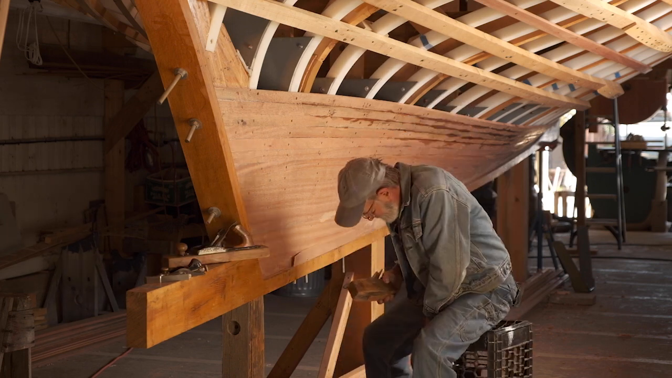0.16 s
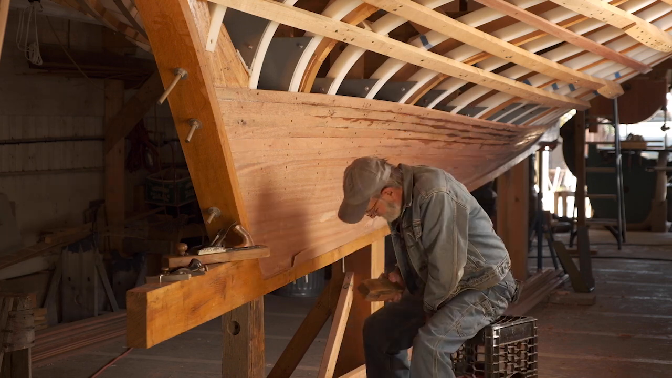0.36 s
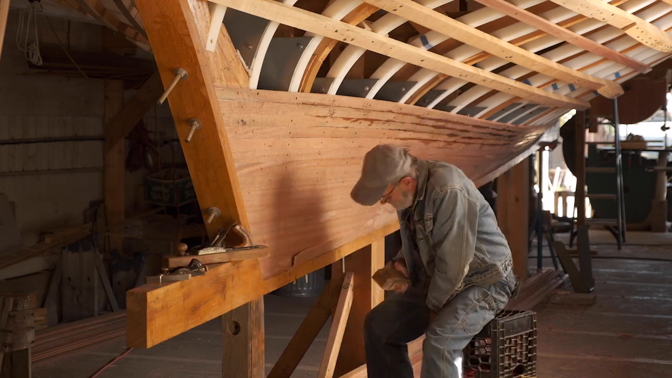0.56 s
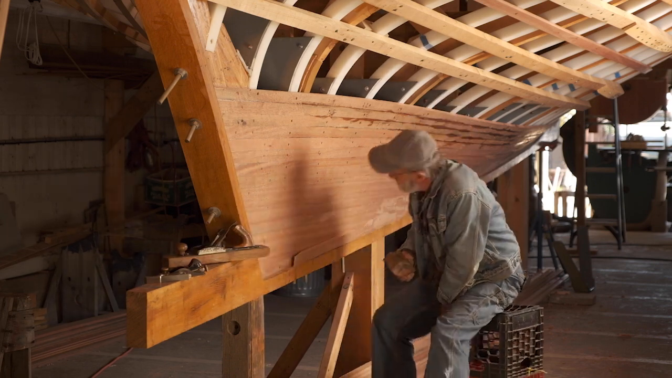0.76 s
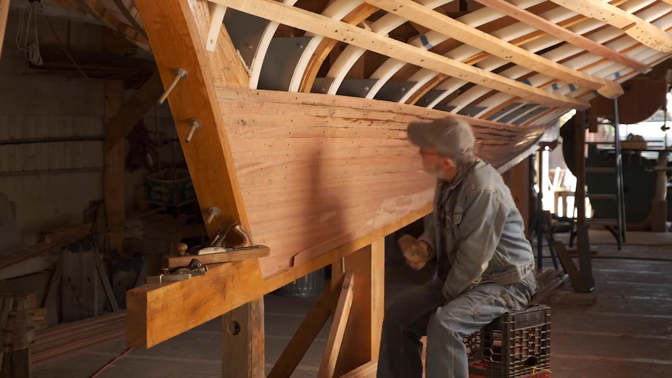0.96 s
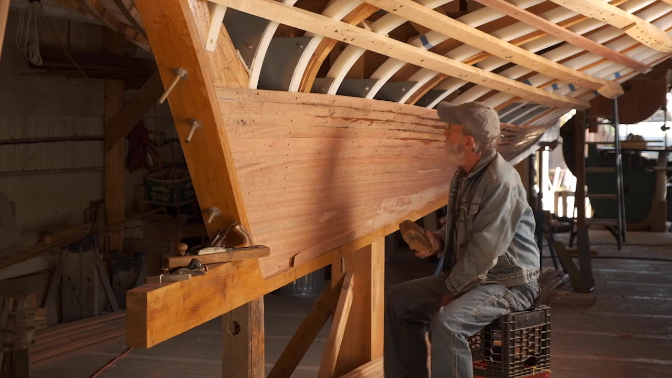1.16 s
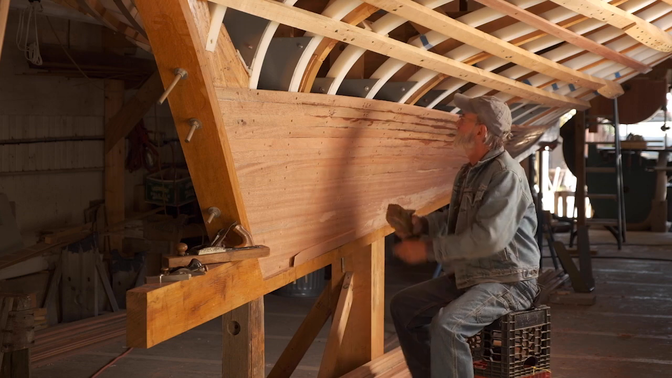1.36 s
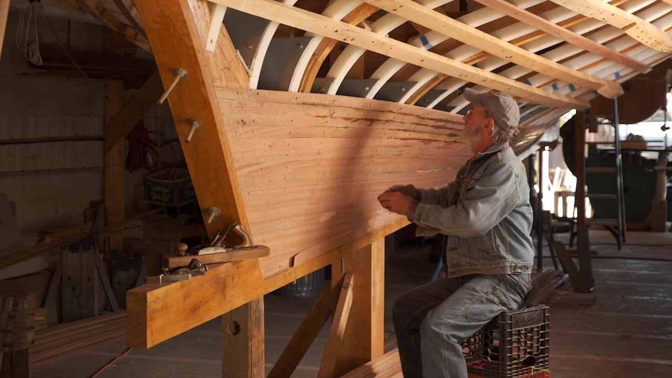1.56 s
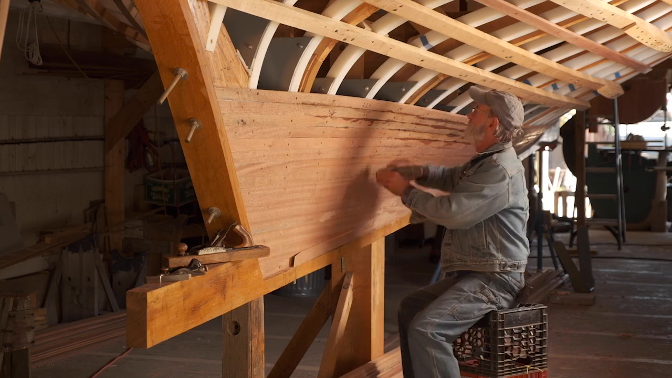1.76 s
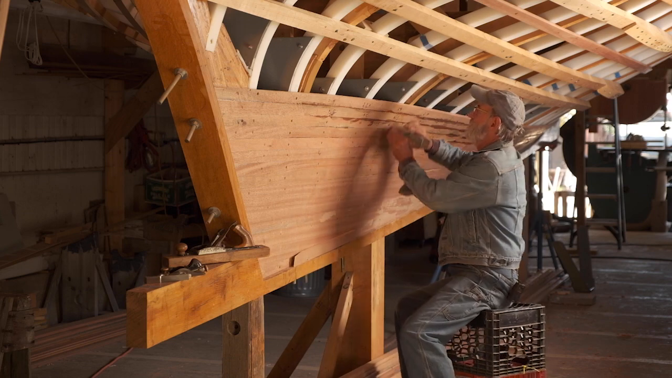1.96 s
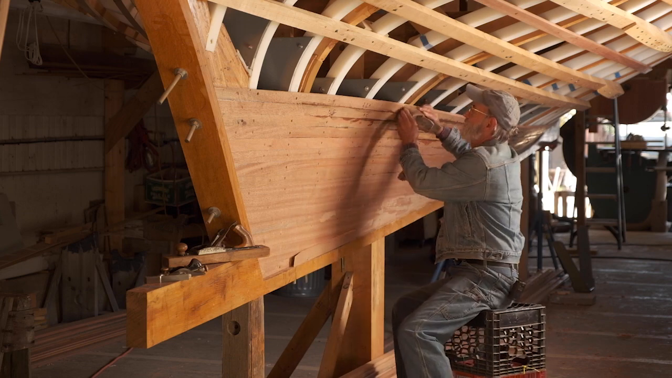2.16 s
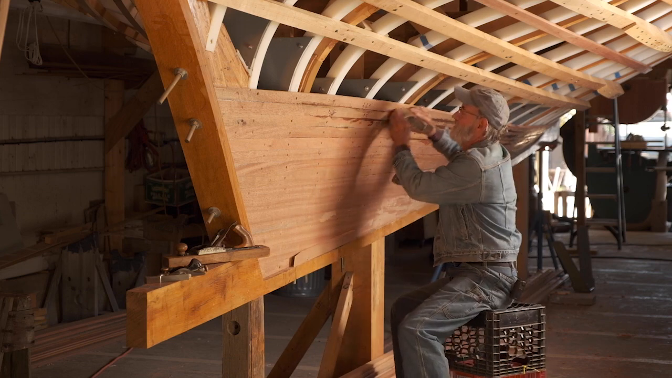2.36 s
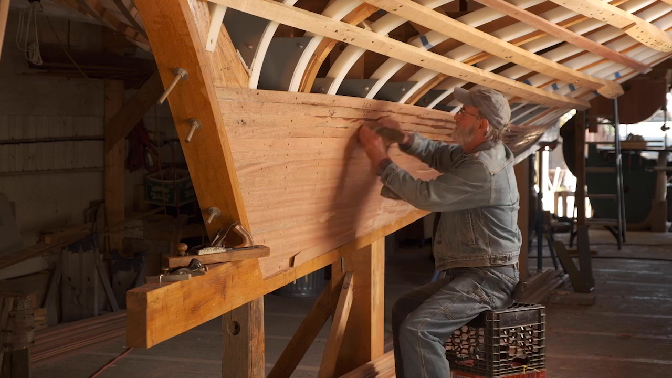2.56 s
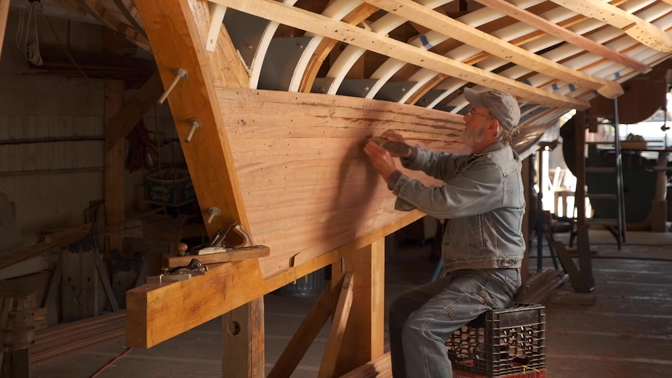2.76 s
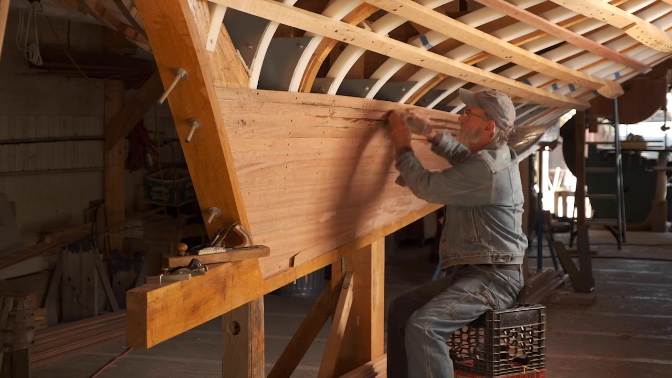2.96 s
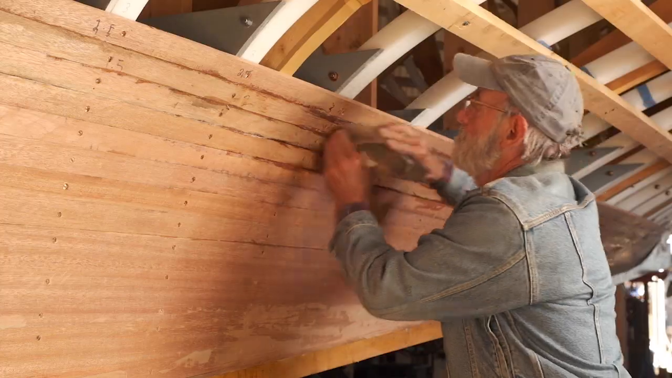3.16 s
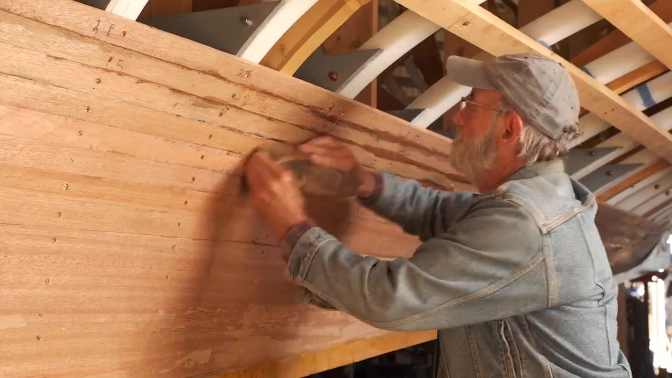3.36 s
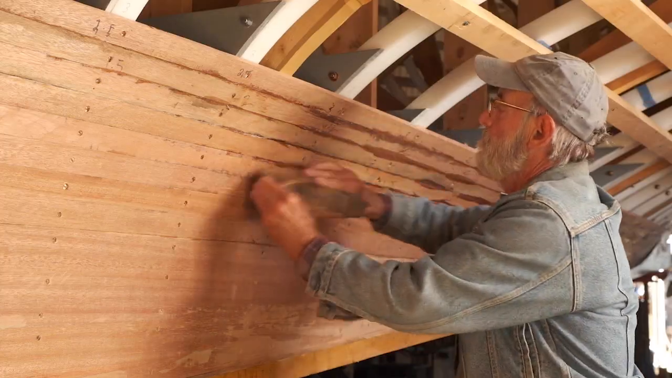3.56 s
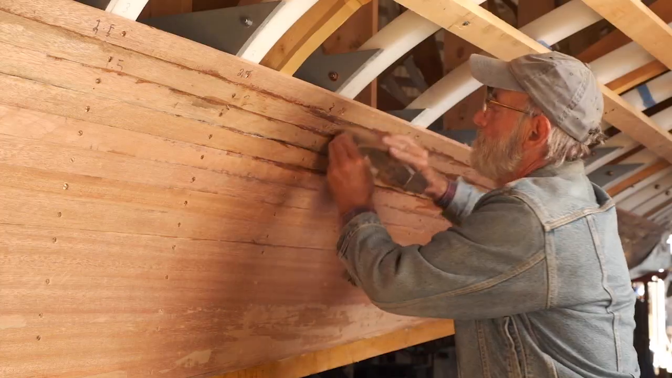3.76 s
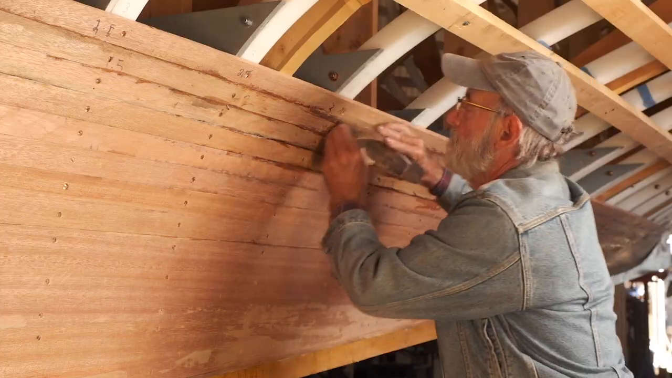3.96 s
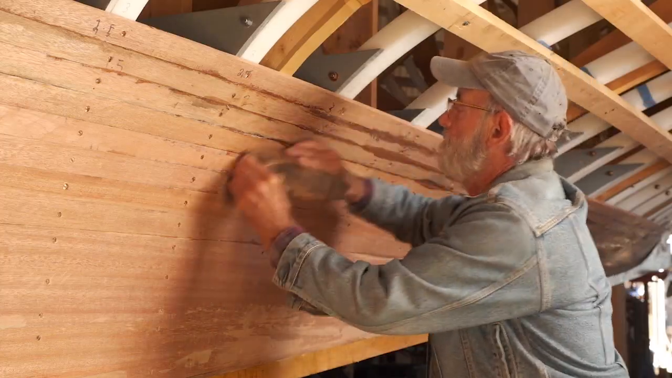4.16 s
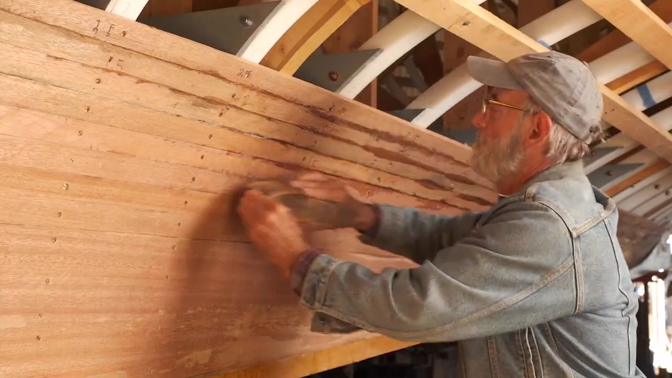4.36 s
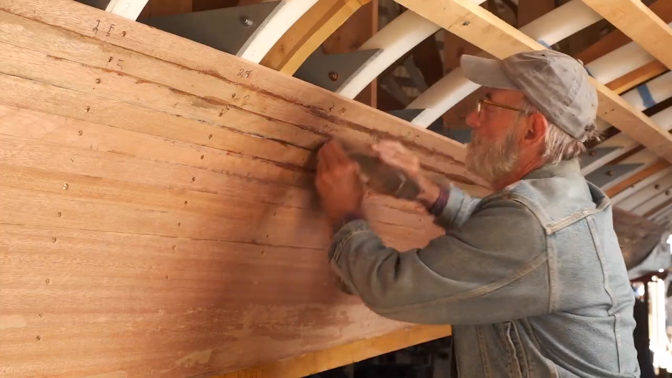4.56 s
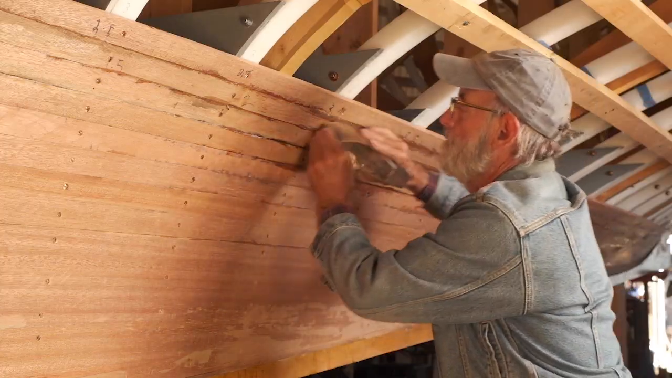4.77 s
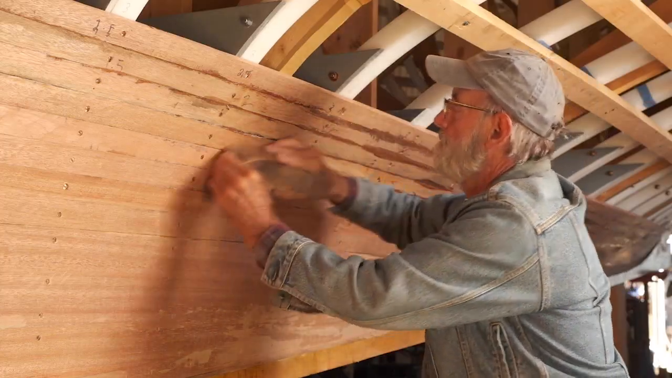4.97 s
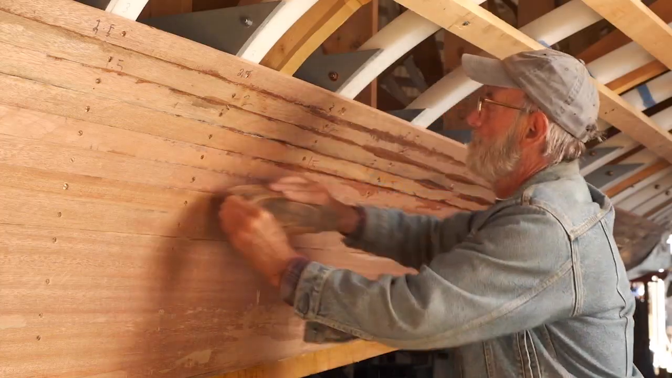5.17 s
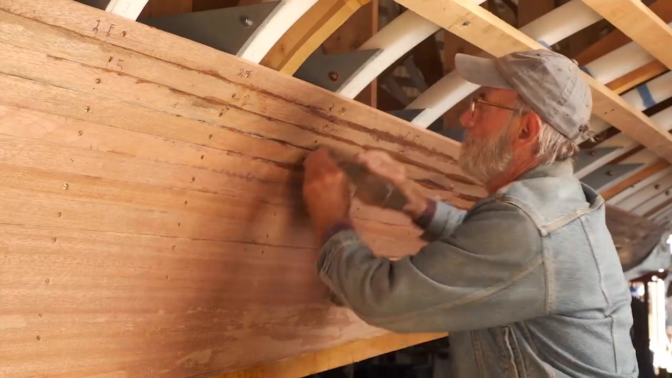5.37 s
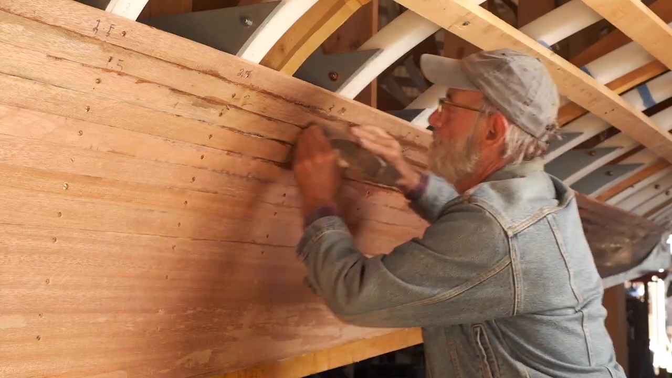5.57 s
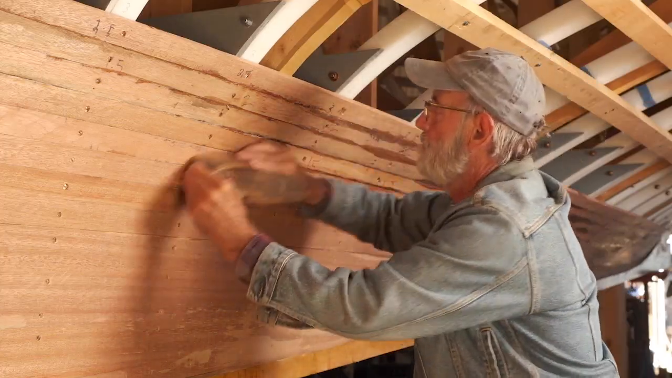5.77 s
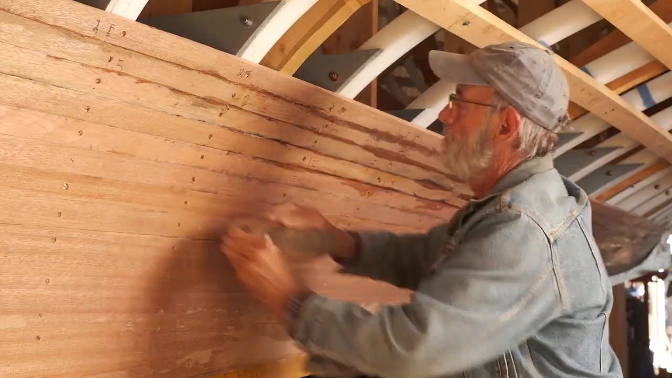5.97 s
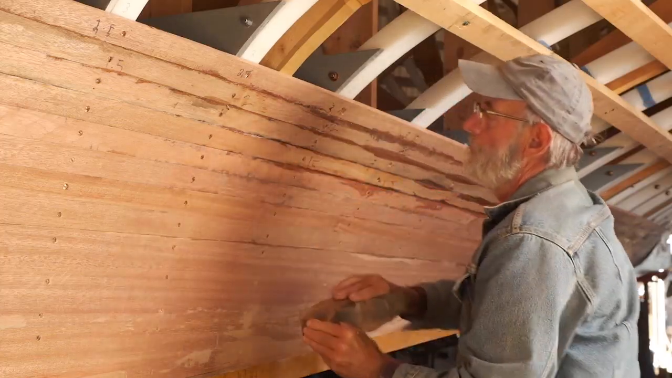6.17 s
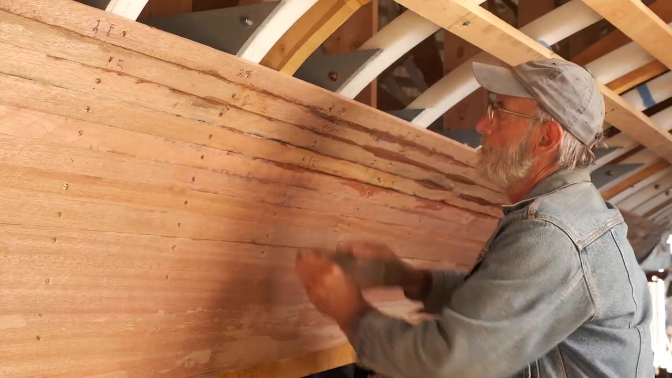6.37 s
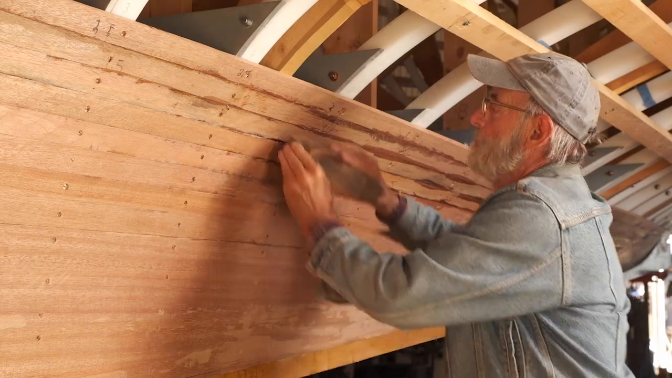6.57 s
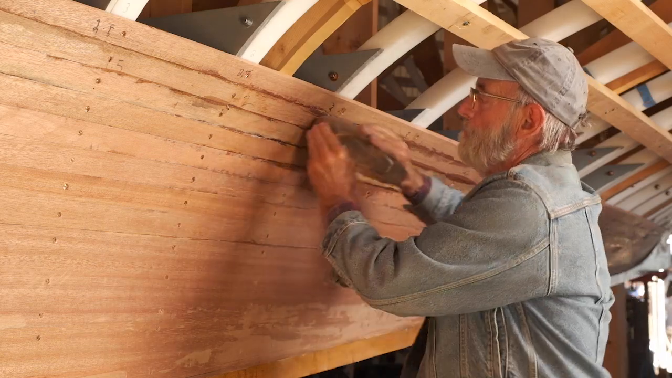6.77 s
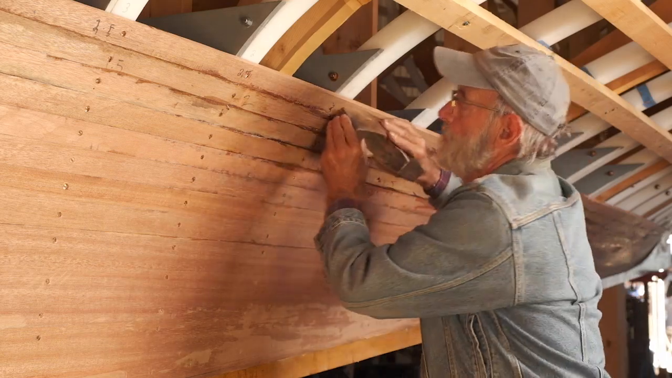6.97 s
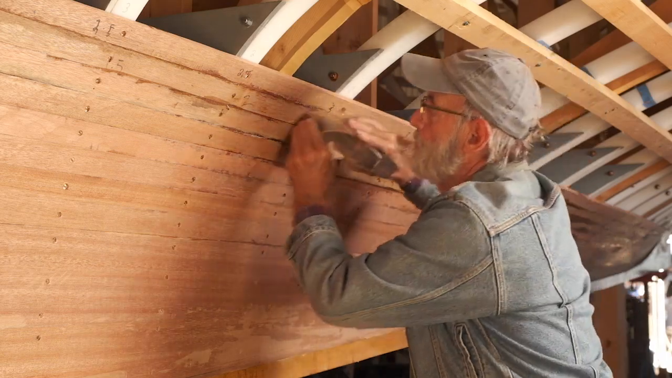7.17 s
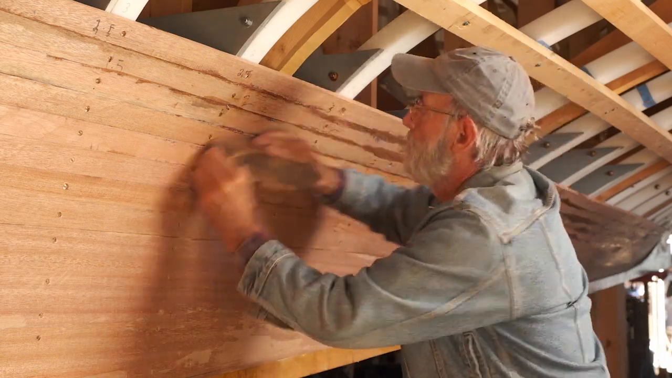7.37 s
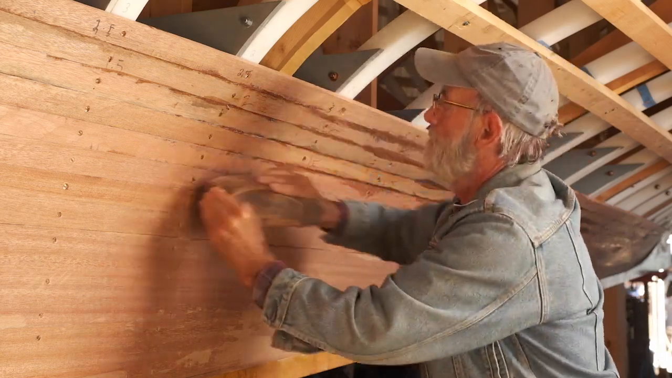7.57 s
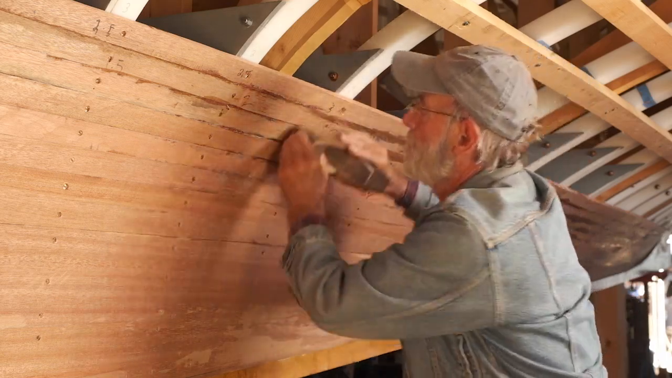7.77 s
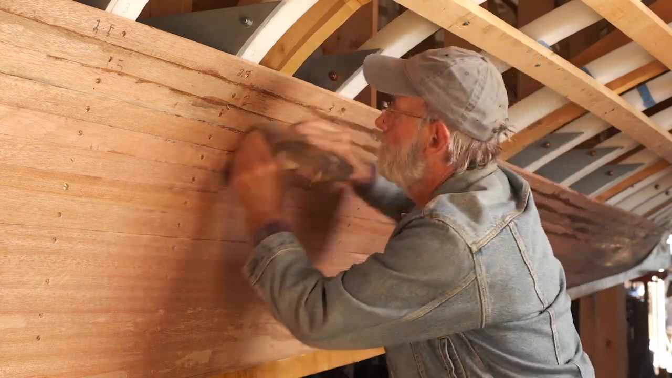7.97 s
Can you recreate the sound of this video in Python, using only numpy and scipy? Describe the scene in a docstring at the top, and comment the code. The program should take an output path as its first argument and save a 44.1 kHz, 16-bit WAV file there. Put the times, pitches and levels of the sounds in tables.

```python
"""In a timber shed, a boatbuilder works on a planked wooden hull.
A long rasping rub along the lower edge and some light brushes give way to short strokes of a hand plane:
the sole knocks down and slides, the iron bites, tears a shaving and catches in the grain.
Random impulses and noise stand for breaking fibres and friction; they excite the resonances of plane,
plank and hull. Decaying noise gives the shed's reverberation, coloured noise its rumble and air."""
import sys
import numpy as np
from scipy import signal
from scipy.fft import rfft, irfft, next_fast_len
from scipy.io import wavfile
from scipy.ndimage import uniform_filter1d, map_coordinates

SR = 44100
rng = np.random.default_rng(int(sys.argv[2]) if len(sys.argv) > 2 else 0)


def dump(signal):
    """Clip the signal to [-1, 1] and save it as 16-bit WAV at the path in sys.argv[1]."""
    limited = np.clip(np.atleast_2d(signal).T, -1, 1)
    pcm = np.round(limited * 32767).astype(np.int16)
    wavfile.write(sys.argv[1], SR, pcm)


N = 354299
TIME = np.arange(N) / SR

# strokes of the plane: (landing [s], relative knock level [dB], contact brightness [Hz],
# ring of the board [Hz], rocking against the knock [dB], iron touches after [s], lift-off after [s],
# sliding sole halfway [relative dB], skimming iron [relative dB])
STROKES = [(2.232, -16, 2600, 618, -1, 0.11, 0.405, -38.5, -39),
           (3.081, -14, 480, 547, -22, 0.097, 0.33, -33, -34),
           (3.938, -9, 1200, 560, -3.5, 0.053, 0.4, -32.5, -36),
           (4.753, -6.5, 1300, 629, -4, 0.058, 0.4, -32, -35),
           (5.582, -8.5, 1265, 678, -9, 0.087, 0.32, -30.5, -23),
           (7.086, -7.5, 1220, 625, -10.5, 0.12, 0.44, -32.5, -28),
           (7.9086, -4.5, 1745, 797, -16, 0.028, 0.53, -26.5, -28.5)]
# the sole rocks flat after landing: (delay [s], level against the stroke's rocking [dB],
# highest contact brightness [Hz], ring of the board [Hz])
ROCKING = [(0.039, -2, 600, 513), (0.068, -11.5, 610, 594)]
# the iron bites and lifts a shaving: (start [s], deepest after [s], length [s], hull [relative dB],
# plane body [relative dB], tearing fibres [relative dB], ring at the start [Hz], ring at the end [Hz])
CUTS = [(2.477, 0.11, 0.16, -26, -24.5, -30, 2290, 1000), (3.232, 0.091, 0.16, -23, -21.5, -26, 1250, 1056),
        (3.472, 0.04, 0.051, -20, -30.5, -34.5, 1290, 1300), (4.143, 0.087, 0.2, -26, -21, -26, 1400, 1300),
        (4.935, 0.052, 0.19, -28.5, -17.5, -27, 1440, 1620),
        (5.734, 0.074, 0.153, -24, -18.5, -24.5, 1470, 1700),
        (7.311, 0.09, 0.23, -35, -22, -28.5, 1410, 1640)]
# the iron catches in the grain and chatters: (time [s], relative level [dB], length [s], ring [Hz])
CATCHES = [(0.03, -27.5, 0.0067, 2680), (1.02, -26.5, 0.012, 1700), (1.415, -41.5, 0.018, 3480),
           (1.449, -37.5, 0.01, 3280), (2.354, -42, 0.078, 2500), (2.539, -26, 0.01, 2500),
           (2.499, -21, 0.018, 2660), (2.578, -21.5, 0.01, 3500), (3.235, -26.5, 0.0091, 2820),
           (3.269, -23.5, 0.019, 2770), (3.321, -18.5, 0.016, 3170), (3.36, -23.5, 0.0089, 2200),
           (3.466, -20.5, 0.0038, 1710), (3.486, -19.5, 0.017, 1330), (4.029, -35.5, 0.019, 2130),
           (4.134, -25, .018, 1250), (4.174, -19.5, 0.022, 2200), (4.255, -14.5, 0.025, 1490),
           (4.831, -44.5, 0.016, 3030), (4.946, -18, 0.017, 2260), (5.017, -22, 0.03, 2200),
           (5.052, -15, 0.014, 1580), (5.739, -13.5, .02, 1450), (5.803, -13, 0.011, 2170),
           (5.828, -17, 0.0051, 2180), (7.302, -20.5, 0.0098, 1590), (7.379, -19, 0.0073, 1600),
           (7.454, -13.5, 0.014, 2970)]
# other knocks of the tool on the planking:
# (time [s], relative level [dB], contact brightness [Hz], ring of the board [Hz])
KNOCKS = [(0.298, -13, 586, 412), (0.689, -21, 500, 430), (1.008, -26, 600, 378), (1.155, -34.5, 700, 410),
          (1.39, -32, 814, 279), (1.54, -37, 1600, 610), (2.425, -21.5, 450, 416), (2.436, -13, 647, 583),
          (2.596, -13, 1740, 534), (4.11, -17.5, 858, 538), (4.328, -12, 960, 685), (4.607, -39, 343, 307),
          (5.809, -6, 1000, 610), (5.872, -11, 1050, 602), (6.263, -39.5, 450, 304), (6.682, -44, 342, 213),
          (6.728, -40.5, 700, 590), (7.057, -23.5, 703, 396), (7.464, -10.5, 875, 504)]
# the sole sticks and slips, and the board groans: (time [s], level [dB], dies within [s], pitch [Hz])
GROANS = [(2.435, -17.5, 0.041, 554), (3.385, -27, 0.043, 603), (3.54, -25, 0.012, 527)]
# the rub along the lower edge: (time [s], hull boom, plank, rasp [relative dB])
RUB = [(0.0, -29, -37, -44), (0.032, -45, -29, -43), (0.066, -32.5, -28, -37), (0.188, -38.5, -27.5, -31.5),
       (0.226, -26, -22, -29), (0.406, -38, -25, -26.5), (0.512, -33.5, -27, -25.5),
       (0.66, -45, -37.5, -27), (0.71, -37.5, -20, -31.5), (0.752, -35.5, -33.5, -30),
       (0.854, -37.5, -22, -31), (0.924, -33.5, -29, -34), (0.994, -46.5, -43, -40.5),
       (1.01, -40.5, -39, -40)]
# light brushes over the plank: (start [s], length [s], plank [relative dB], rasp [relative dB])
BRUSHES = [(1.021, 0.09, -43.5, -35.5), (1.122, 0.062, -51, -53), (1.413, 0.1, -46.5, -46),
           (1.506, 0.086, -52, -58), (1.64, 0.165, -42.5, -49)]
# soft heavy bumps against the hull: (time [s], relative level [dB], pitch [Hz])
BUMPS = [(0.024, -22.5, 75.4), (0.217, -21, 154), (0.257, -24, 177), (0.299, -18, 193), (0.689, -26.5, 243),
         (1.388, -26, 152), (1.814, -41, 184), (2.236, -27, 205), (2.628, -24.5, 187), (3.083, -22.5, 229),
         (3.302, -39, 200), (6.681, -45, 167.5), (7.09, -24.5, 160)]
# a thin high whistle comes and goes: (start [s], length [s], level [dB])
WHISTLES = [(4.78, 0.26, -64), (5.744, 0.63, -66)]

# resonances of the planked hull: (centre [Hz], width [Hz], level [dB])
HULL_MODES = [(145, 68, -12.5), (201, 23, -3.5), (251.2, 20, -6.5), (321, 33, -8), (456, 19, -1.5),
              (525.4, 53, 1.5), (553, 47, 3), (657, 34, -1.5), (752, 89, -6.5), (834, 98, -4),
              (978, 130, -6.5), (1045, 61, -13.5)]
# resonances of the plane's body and iron: (centre [Hz], width [Hz], level [dB])
PLANE_MODES = [(1115, 140, -4.5), (1362, 126, 3), (1490, 130, -1.5), (1890, 210, -1.5), (2174, 130, -2),
               (2433, 150, 2), (2890, 440, -6.5), (3130, 240, -1.5)]
# resonances of the lower plank: (centre [Hz], width [Hz], level [dB])
PLANK_MODES = [(401, 40, 6.5), (470, 45, 4.5), (603, 190, -6), (953, 170, -5), (1414, 190, -12)]
# resonances of the steel tick: (centre [Hz], width [Hz], level [dB])
TICK_MODES = [(1170, 110, -0.5), (2350, 480, 0)]

# gain spectrum of tearing fibres: (frequency [Hz], level [dB])
TEAR_SPECTRUM = [(300, -47), (1500, -16), (2600, -2), (3200, 0), (3750, 7), (4250, -3), (4750, 1),
                 (6300, -8.5), (8000, -13.5), (10000, -25), (12000, -30), (15500, -34)]
# gain spectrum of the rasp: (frequency [Hz], level [dB])
RASP_SPECTRUM = [(300, 2), (1200, 8), (1800, 2), (3000, 2.5), (4800, 2), (6500, -4.5), (8000, -11.5),
                 (10000, -21), (15500, -43)]
# gain spectrum of the hull's boom under the rubbing: (frequency [Hz], level [dB])
BOOM_SPECTRUM = [(30, -27), (65, -1.5), (130, 3.0), (220, 1.0), (300, -13.5), (500, -47)]
# gain spectrum of rumble and shudder: (frequency [Hz], level [dB])
DEEP_SPECTRUM = [(10, -20.5), (22, -4), (36, 4.5), (60, -7.5), (100, -7), (160, -18), (400, -54.5)]
# gain spectrum of the shop's air: (frequency [Hz], level [dB])
AIR_SPECTRUM = [(30, -3.5), (100, 4.5), (150, -4), (250, -13), (500, -16.5), (1000, -18.5), (2000, -24.5),
                (5000, -25), (15500, -25)]
# gain spectrum of the whoosh: (frequency [Hz], level [dB])
WHOOSH_SPECTRUM = [(100, -6.0), (250, 2), (550, -4.0), (1200, -8), (2500, -12), (8000, -23.5)]
# decay of the dense high modes of the planking: (frequency [Hz], time to fall 60 dB [s])
BOARD_DECAY = [(150, 0.27), (600, 0.21), (1200, .09), (2500, 0.047), (8000, 0.02)]
# decay of the shed's reverberation: (frequency [Hz], time to fall 60 dB [s])
SHED_DECAY = [(100, 0.58), (700, 0.36), (2000, 0.4), (5000, 0.31), (12000, 0.37)]

EDGE_S = 0.0084  # a contact sets in and lets go within this time
SLIDE_DELAY_S, PUSH_DB = 0.06, 8.5  # the sole starts to slide; it grows by this much until lift-off
SOLE_RING_DB, SOLE_RING_HZ = -21.5, 632  # the plane's body rings faintly on the bare slide
SKIM_RING_HZ = 1350  # the plane's ring when the iron first touches
SKIM_TEAR_DB = -11.5  # fibres of the skimming iron against the plane's body
# swells: (start under the crest [dB], end under the crest [dB])
SKIM_SWELL = (14, 7.1)
HULL_SWELL, BODY_SWELL, TEAR_SWELL = (11, 4.4), (6.5, 12), (6.5, 9)
HULL_LAG_S = 0.035  # the hull drums loudest just after the deepest point
NODES_DB = 4.2  # random patches in the plane's colour
# the steel ticks louder the brighter the contact
TICK_DB, TICK_AT_HZ, TICK_DB_PER_OCTAVE = -19.5, 1300, 12.5
CLICK_DB = -22  # the bare instant of contact, against the steel's tick
GROAN_ATTACK_S, GROAN_WAVER = 0.0026, 0.023  # onset; unsteadiness as a share of the pitch
RASP_HZ, RASP_HZ_PER_DB = 2780, 66  # rasp centre at its mean level; harder rubbing is brighter
BRUSH_EDGE_DB, BRUSH_BOOM_DB = 11.5, -9  # ends under the middle; hull boom against the plank
SHUDDER_DB = -10.5  # deep shudder against the hull's boom
WHISTLE_HZ = 14115
RUMBLE_DB, RUMBLE_WAVER_DB = -56, 0.5
HISS_DB, HISS_END_S = -56, 1.595
# the whoosh starts at WHOOSH_DB and falls by WHOOSH_FADE_DB
WHOOSH_START_S, WHOOSH_LENGTH_S, WHOOSH_DB, WHOOSH_FADE_DB = 6.015, 0.74, -48, 25
WHOOSH_FROM_HZ, WHOOSH_TO_HZ = 1100, 280
TOP_HZ = 15830  # upper band limit


def planing():
    """Fracture excites resonance: a shaving breaks in uneven clumps that shake plane and hull."""
    drum, body, tear = effort()
    centre = ring_centre()
    clumps = amp(2 * wobble(190) + 1.4 * wobble(50))
    fibres = clumps * snaps(9000, spread_db=3.5)
    jolts = clumps * snaps(2200, spread_db=3)
    # the travelling plane crosses nodes of the boards, so single resonances swell and fade
    hull = resonate(butter(jolts, 1700, "low"), HULL_MODES)
    hull = shifting(hull, centre, lift_db=9.5, octaves=0.28, patchy_db=NODES_DB)
    plane = resonate(butter(jolts + fibres, 5000, "low"), PLANE_MODES)
    plane = shifting(plane, centre, lift_db=7, octaves=0.5, patchy_db=NODES_DB)
    # the negative lift hollows out the hiss of the mouth around the plane's ring
    mouth = coloured(fibres, TEAR_SPECTRUM)
    mouth = shifting(mouth, centre, lift_db=-10.0, octaves=1.0, patchy_db=NODES_DB)
    return drum * hull + amp(-4.5) * body * plane + amp(-3.0) * tear * mouth


def effort():
    """Contact force sets the drive of hull, plane body and fibres: sole slides, iron skims, then cuts."""
    drum, body, tear = np.zeros((3, N))
    for s, *_, touch, lift, slide_db, skim_db in STROKES:
        slide = amp(slide_db) * ramp(s + SLIDE_DELAY_S, s + lift, PUSH_DB, EDGE_S)
        skim_length = lift - touch
        skim = amp(skim_db) * swell(s + touch, skim_length / 2, skim_length, SKIM_SWELL, EDGE_S)
        drum += slide
        body += skim + amp(SOLE_RING_DB) * slide
        tear += amp(SKIM_TEAR_DB) * skim
    # independent drives add by power
    for s, crest, length, hull_db, body_db, tear_db, *_ in CUTS:
        drum = np.hypot(drum, amp(hull_db) * swell(s, crest + HULL_LAG_S, length, HULL_SWELL, EDGE_S))
        body = np.hypot(body, amp(body_db) * swell(s, crest, length, BODY_SWELL, EDGE_S))
        tear = np.hypot(tear, amp(tear_db) * swell(s, crest, length, TEAR_SWELL, EDGE_S))
    return drum, body, tear


def ring_centre():
    """Contact shifts resonance: (time [s], ring [Hz]), low when sliding, higher at touch, gliding in cuts."""
    points = []
    for s, *_, touch, _lift, _slide_db, _skim_db in STROKES:
        points += [(s + touch - EDGE_S, SOLE_RING_HZ), (s + touch + EDGE_S, SKIM_RING_HZ)]
    for s, _, length, *_, start_hz, end_hz in CUTS:
        points += [(s, start_hz), (s + length, end_hz)]
    return sorted(points)


def catches():
    """Stick-slip: a quick run of hard slips of the iron, each a short crack that rings the plane."""
    out, t = np.zeros(N), np.arange(SR // 10) / SR
    for s, db, length, hz in CATCHES:
        slips = np.cumsum(rng.uniform(0.0029, 0.0031, 24))
        since = t - np.r_[0, slips][np.searchsorted(slips, t)]
        release = np.exp(-np.maximum(t - length, 0) / 0.005)
        cracks = rng.standard_normal(len(t)) * np.exp(-since / 0.003) * release
        ring = unit(cracks) + 0.31 * resonate(cracks, PLANE_MODES)
        burst = butter(resonate(ring, [(hz, 0.49 * hz, 0)]), 6200, "low", order=5)
        # equal energy per second of the catch's length
        burst *= np.sqrt(length * SR / np.sum(burst ** 2))
        add(out, s, amp(db - 3.0) * burst)
    return out


def knocks():
    """Impact excitation: the sole lands and rocks flat; a softer contact leaves only the low modes."""
    out, t = np.zeros(N), np.arange(SR // 2) / SR
    for s, db, bright_hz, ring_hz in contacts():
        contact = rng.standard_normal(len(t)) * np.exp(-t / 0.0005)
        boards = butter(tail(BOARD_DECAY), 420, "high")
        boards = unit(butter(boards, bright_hz, "low", order=3))
        # high bending waves run fastest along the board, so its ring falls in pitch
        phase = 2 * np.pi * np.cumsum(ring_hz * (0.97 + 0.097 * np.exp(-t / 0.0089))) / SR
        ring = unit(np.sin(phase) * (1 - np.exp(-t / 0.002)) * np.exp(-t / 0.014))
        wood = 0.5 * resonate(contact, HULL_MODES) + 1.15 * boards + 1.1 * ring
        wood *= 1 - np.exp(-t / 0.0031)
        tick = resonate(rng.standard_normal(len(t)) * np.exp(-t / 0.0043), TICK_MODES)
        steel = butter(tick + amp(CLICK_DB) * unit(contact), 5000, "low", order=1)
        tick_db = TICK_DB + TICK_DB_PER_OCTAVE * np.log2(bright_hz / TICK_AT_HZ)
        add(out, s, amp(db - 24.0) * (unit(wood) + amp(tick_db) * steel))
    return out


def contacts():
    """Successive impacts: (time [s], relative level [dB], brightness [Hz], ring [Hz]) of each knock."""
    rows = list(KNOCKS)
    for s, db, bright_hz, ring_hz, rock_db, *_ in STROKES:
        rows.append((s, db, bright_hz, ring_hz))
        for delay, softer_db, dull_hz, hz in ROCKING:
            rows.append((s + delay, db + rock_db + softer_db, min(dull_hz, bright_hz), hz))
    return rows


def groans():
    """Stick-slip locked to a mode: regular slips hold one board mode briefly, with unsteady pitch."""
    out = np.zeros(N)
    drift = 1 + GROAN_WAVER * wobble(120)
    for s, db, life, hz in GROANS:
        since = np.maximum(TIME - s, 0)
        envelope = (1 - np.exp(-since / GROAN_ATTACK_S)) * np.exp(-(since / life) ** 2)
        out += amp(db) * envelope * np.sin(2 * np.pi * hz * np.cumsum(drift) / SR)
    return out


def rubbing():
    """Friction excitation: dense fine slips rasp, sing in the lower plank and boom in the hull."""
    times, *levels = np.transpose(RUB)
    contact = gate(times[0], times[-1], fade=0.024)
    boom, plank, rasp = [contact * amp(np.interp(TIME, times, db)) for db in levels]
    rasp_db = levels[-1]
    centre = np.transpose([times, RASP_HZ + RASP_HZ_PER_DB * (rasp_db - rasp_db.mean())])
    for s, length, brush_plank_db, brush_rasp_db in BRUSHES:
        touch = swell(s, length / 2, length, (BRUSH_EDGE_DB, BRUSH_EDGE_DB), fade=0.02)
        boom = boom + amp(brush_plank_db + BRUSH_BOOM_DB) * touch
        plank = plank + amp(brush_plank_db) * touch
        rasp = rasp + amp(brush_rasp_db) * touch
    grip = amp(wobble(79.26))  # random unevenness of about 1 dB
    low = coloured(grip * snaps(1500, spread_db=-2.5), BOOM_SPECTRUM)
    shudder = amp(SHUDDER_DB) * coloured(rng.standard_normal(N), DEEP_SPECTRUM)
    body = resonate(grip * snaps(4000, spread_db=2), PLANK_MODES)
    body = shifting(body, centre, lift_db=6.5, octaves=1, patchy_db=3.0)
    grit = coloured(grip * snaps(9000, spread_db=-2.5), RASP_SPECTRUM)
    grit = shifting(grit, centre, lift_db=0.5, octaves=0.26, patchy_db=2.0)
    return amp(-3.0) * boom * (low + shudder) + amp(-1.5) * plank * body + amp(-0.6) * rasp * grit


def bumps():
    """Heavily damped oscillation: dull pushes die within a few cycles in the hull."""
    out, t = np.zeros(N), np.arange(SR // 4) / SR
    envelope = (1 - np.exp(-t / 0.0017)) * np.exp(-t / 0.0051)
    for s, db, hz in BUMPS:
        add(out, s, amp(db + 9.5) * np.sin(2 * np.pi * hz * t) * envelope)
    return out


def whistle():
    """Pure tone: a very faint steady high sine, sounded twice."""
    level = sum(amp(db) * gate(s, s + length, fade=0.008) for s, length, db in WHISTLES)
    return level * np.sin(2 * np.pi * WHISTLE_HZ * TIME)


def background():
    """Broadband noise: rumble and air of the shop, and white hiss under the opening."""
    rumble_level = amp(RUMBLE_DB + RUMBLE_WAVER_DB * wobble(1.7))
    rumble = rumble_level * coloured(rng.standard_normal(N), DEEP_SPECTRUM)
    air = amp(-55.5) * coloured(rng.standard_normal(N), AIR_SPECTRUM)
    hiss = amp(HISS_DB) * gate(0, HISS_END_S, fade=0.01) * unit(rng.standard_normal(N))
    return rumble + air + hiss + whoosh()


def whoosh():
    """Moving resonance in noise: a faint whoosh falls and fades while the plane is lifted clear."""
    start, end = WHOOSH_START_S, WHOOSH_START_S + WHOOSH_LENGTH_S
    breath = coloured(rng.standard_normal(N), WHOOSH_SPECTRUM)
    centre = [(start, WHOOSH_FROM_HZ), (end, WHOOSH_TO_HZ)]
    breath = shifting(breath, centre, lift_db=9, octaves=0.3, patchy_db=3)
    fading = ramp(start, end, -WHOOSH_FADE_DB, fade=0.076)
    return amp(WHOOSH_DB - WHOOSH_FADE_DB / 2) * fading * breath


def amp(db):
    """Logarithmic level: decibels to gain."""
    return 10 ** (np.asarray(db) / 20)


def unit(x):
    """Normalisation: scale to rms 1."""
    return x / np.sqrt(np.mean(x ** 2) + 1e-20)


def along(points, hz):
    """Logarithmic frequency scale: interpolate (frequency [Hz], value) points."""
    f, v = np.transpose(points)
    return np.interp(np.log(hz + 1), np.log(f), v)


def wobble(rate):
    """Slow random modulation: a smooth curve with rate knots a second."""
    knots = rng.standard_normal(int(N * rate / SR) + 4)
    return map_coordinates(knots, [TIME * rate], order=2)


def filtered(x, response):
    """Linear filtering: the spectrum of x times a complex response of frequency."""
    m = next_fast_len(len(x) + 8192)
    return irfft(rfft(x, m) * response(np.fft.rfftfreq(m, 1 / SR)), m)[:len(x)]


def coloured(x, spectrum):
    """Spectral shaping: x through a broad gain curve, at rms 1."""
    return unit(filtered(x, lambda f: amp(along(spectrum, f))))


def resonate(x, modes):
    """Modal superposition: x through a body's resonances, alternating in sign, at rms 1."""
    def response(f):
        total = 0
        for k, (centre, width, db) in enumerate(modes):
            damping = 1j * f * width
            total = total + (-1) ** k * amp(db) * damping / (centre * centre - f * f + damping)
        return total
    return unit(filtered(x, response))


def butter(x, hz, kind, order=2):
    """Causal filtering: a Butterworth low-pass or high-pass."""
    return signal.sosfilt(signal.butter(order, min(hz, SR / 2 - 1), kind, fs=SR, output="sos"), x)


def tail(decay):
    """Frequency-dependent damping: half a second of decaying noise with energy 1."""
    hz, t, z = signal.stft(rng.standard_normal(SR // 2), SR, nperseg=256)
    fall_db = -60 * t / along(decay, hz)[:, None]
    x = signal.istft(z * amp(fall_db), SR, nperseg=256)[1][:SR // 2]
    return x / np.linalg.norm(x)


def snaps(rate, spread_db):
    """Random impulses: rate small snaps a second on average, with uneven strengths, at rms 1."""
    moments = rng.random(N) < rate / SR
    signs = rng.choice([-1, 1], N)
    strengths = amp(spread_db * np.clip(rng.standard_normal(N), -2, 2))
    return unit(moments * signs * strengths)


def shifting(x, centre, lift_db, octaves, patchy_db):
    """Time-varying resonance: follows (time [s], centre [Hz]) with patchy colour, holding mean power."""
    hz, t, z = signal.stft(x, SR, nperseg=1024)
    away = np.log2((hz[:, None] + 1) / np.interp(t, *np.transpose(centre))) / octaves
    field = uniform_filter1d(rng.standard_normal(z.shape), size=3, axis=0)
    field = unit(uniform_filter1d(field, size=6, axis=1))
    gain = amp(lift_db * np.exp(-away ** 2) + patchy_db * field)
    power = np.mean(abs(z) ** 2, axis=1)
    gain /= np.sqrt(power @ gain ** 2 / power.sum())
    return signal.istft(z * gain, SR, nperseg=1024)[1][:N]


def gate(start, end, fade):
    """Contact on and off: gain 1 from start to end, with straight fades outside."""
    return np.clip(1 + np.minimum(TIME - start, end - TIME) / fade, 0, 1)


def ramp(start, end, change_db, fade):
    """Steady change of force: a contact's level in dB moves linearly, passing 0 dB halfway."""
    return gate(start, end, fade) * amp(change_db * np.interp(TIME, [start, end], [-0.5, 0.5]))


def swell(start, crest, length, edges_db, fade):
    """Rise and fall of force: a contact arches up to 0 dB, crest seconds after its start, then eases."""
    away = np.interp(TIME - start, [0, min(crest, length), length + fade], [-1, 0, 1])
    return gate(start, start + length, fade) * amp(-np.where(away < 0, *edges_db) * away ** 2)


def add(track, s, x):
    """Superposition: mix x into the track at s seconds."""
    part = track[max(round(s * SR), 0):][:len(x)]
    part += x[:len(part)]


def scene():
    """Reverberation: all the work sounds in the shed, which answers after a short gap."""
    work = planing() + catches() + knocks() + groans() + rubbing() + bumps()
    gap = round(0.011 * SR)
    shed = np.pad(butter(tail(SHED_DECAY), 7400, "low"), (gap, 0))
    echo = signal.fftconvolve(work, shed)[:N]
    return (work + amp(-10.5) * echo + background() + whistle())[None]


def record(dry):
    """Band limitation: nothing passes at or above TOP_HZ."""
    return np.array([filtered(x, lambda hz: hz < TOP_HZ) for x in dry])


dry = scene()
out = record(dry)
dump(out)
```